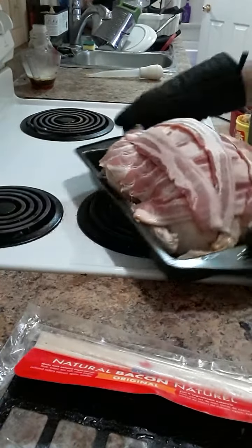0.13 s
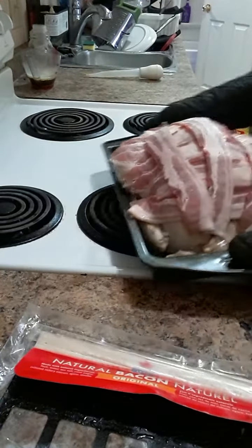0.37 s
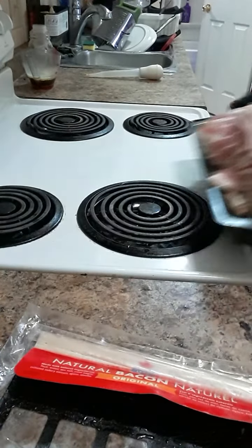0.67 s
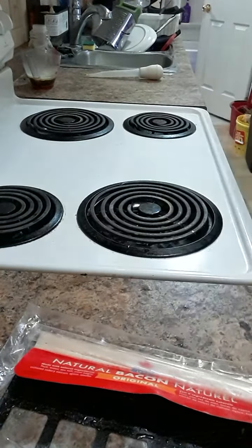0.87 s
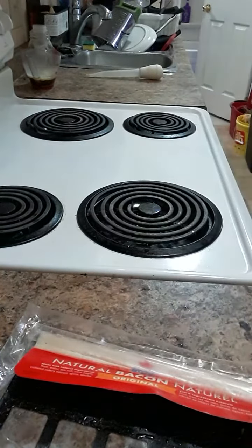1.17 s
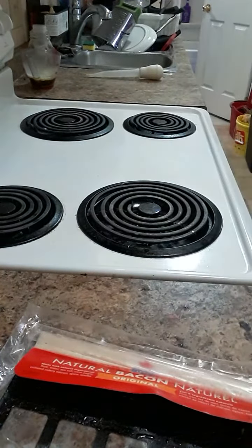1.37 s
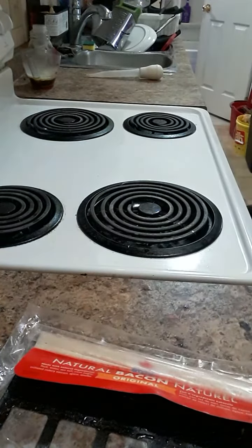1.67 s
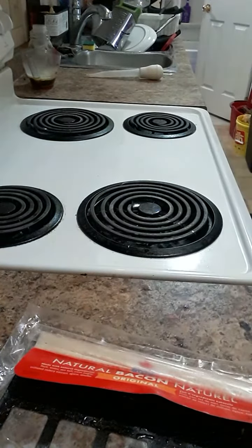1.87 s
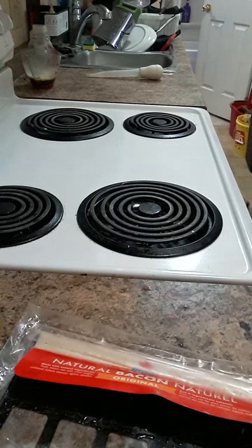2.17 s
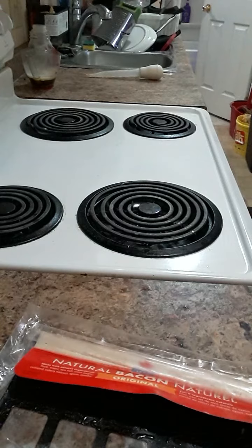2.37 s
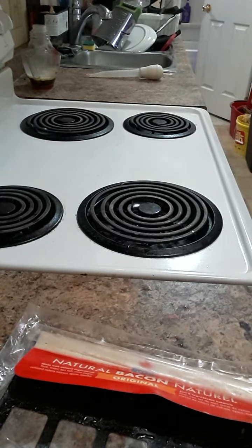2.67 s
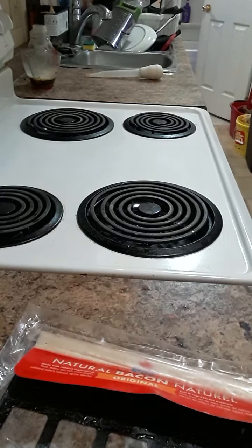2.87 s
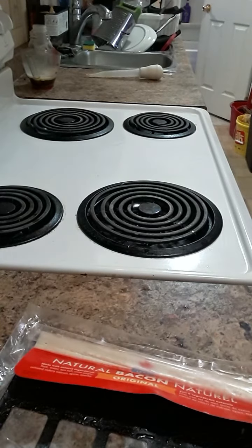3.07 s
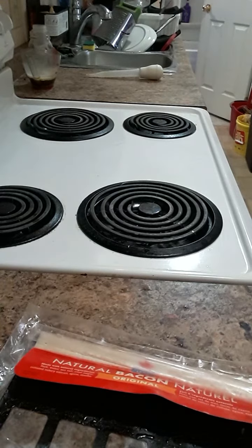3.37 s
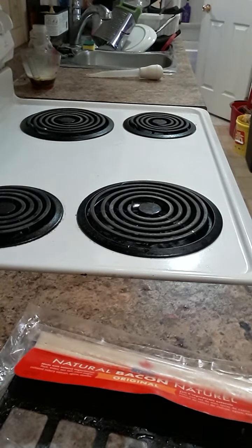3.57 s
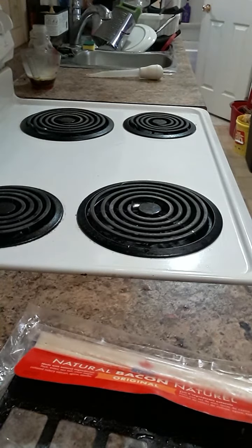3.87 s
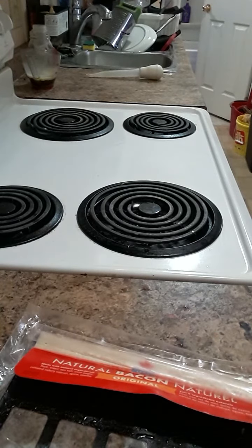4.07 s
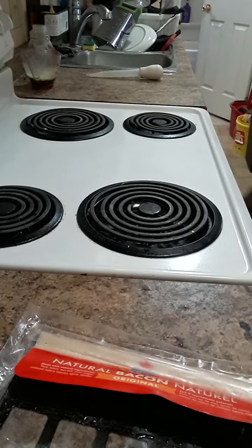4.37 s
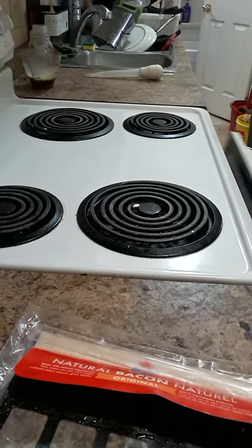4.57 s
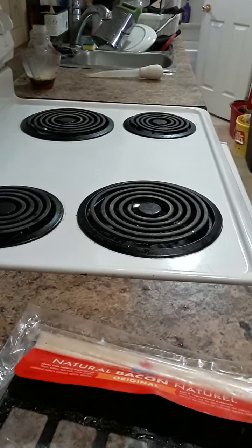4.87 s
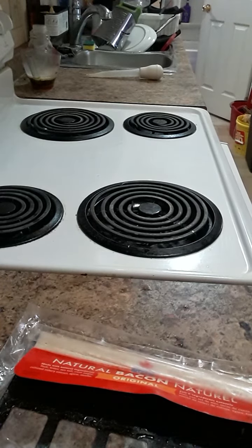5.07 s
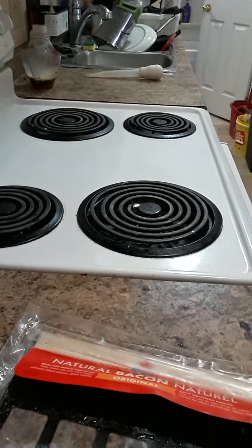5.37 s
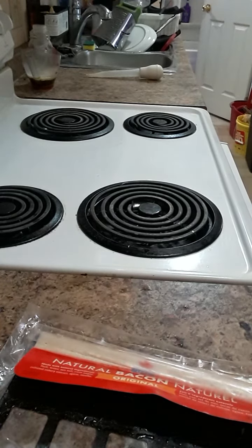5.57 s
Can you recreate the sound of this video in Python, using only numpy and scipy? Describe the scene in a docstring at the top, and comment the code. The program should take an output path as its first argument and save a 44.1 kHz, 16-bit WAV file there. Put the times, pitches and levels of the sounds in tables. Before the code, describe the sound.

Short metallic drag and tap, a pause, loud pan clatter into an oven, faint bumps, then a heavy rattling oven door slam.

```python
"""A steel roasting pan is dragged off an electric hob, stalling once while its rim taps the hob top and the top flexes.
It bumps onto an oven rack and slides in; the oven door swings, slams and bounces; last come two more pan bumps.
Drag, bumps and slams are bursts of random contacts that ring sheet steel; taps and thumps are single pushes on modes.
After the drag, sleeves rustle and the oven booms low; the room hums throughout.
Two microphone ports hear it in a small kitchen, the right one the more open to the treble."""
import sys
import numpy as np
from scipy import signal
from scipy.fft import rfft, irfft
from scipy.io import wavfile
from scipy.ndimage import uniform_filter1d

SR = 44100
rng = np.random.default_rng(int(sys.argv[2]) if len(sys.argv) > 2 else 0)


def materialize(psi):
    """Save the field psi as 16-bit PCM at rate SR to the path in sys.argv[1].

    A 1-D psi becomes a single channel; in a 2-D psi each row is a channel.
    """
    bounded = np.clip(np.atleast_2d(psi).T, -1, 1)
    quanta = np.round(bounded * 32767).astype(np.int16)
    wavfile.write(sys.argv[1], SR, quanta)


N = 251811  # samples

# Levels are relative: source mix, room and port gains follow. A mode's level sets its share of energy.

# the pan bumps the rack and the oven walls:
# (time [s], clatter level [dB], thud over clatter [dB], clank over clatter [dB], clatter t60 [s])
BUMPS = [(0.596, -44, -32, -16, 0.25), (1.106, -64.5, 2, 11, 0.15), (1.592, -47, -5, -8, .16),
         (1.952, -27.5, 2, -5, 0.23), (1.96, -22, -3.5, -4, .22), (1.974, -17.5, -11, -4.5, .24),
         (2.029, -21, -6, -16, 0.3), (2.064, -25.5, -12, -5, 0.29), (2.112, -15.5, -7.5, -7, .2),
         (2.133, -20.5, -22, -17, .21), (2.179, -26, -11, -14, 0.28), (2.223, -31, -4, -12, 0.25),
         (2.267, -35.5, -3, -20, .4), (2.432, -41.5, -1, -6.5, 0.23), (2.688, -46, -12, -7, 0.47),
         (2.859, -48.5, -2, 4.5, 0.28), (2.912, -46.5, 1, 9.5, 0.19), (3.328, -43.5, 5, -24, 0.1),
         (3.584, -44, -30, -11.5, 0.17), (3.768, -36, -3.5, -7.5, 0.15), (3.867, -46.5, 0, -10, .22),
         (4.161, -42.5, 0, -0.5, 0.15), (4.275, -44.5, 0, -3, 0.23), (5.593, -48, -2, -7, 0.11),
         (5.658, -38, -31, -3.5, 0.2)]
# clearest modes of the pan on its rack: (frequency [Hz], width [Hz], level [dB])
PAN_MODES = [(120, 5.1, -5), (280, 2, -10), (331.4, 1.1, 0), (516, 23, 5.5), (567.5, 9.9, 0.5),
             (641, 16, 4), (730, 13, -2.5), (810, 11.4, 0), (871, 18, 0), (1040, 18, -14.5),
             (1084, 22, 0.5), (1338, 21, -4.5), (1727, 20, -32), (2066, 22, -1.5), (2490, 33, -13),
             (3250, 55, -26), (4100, 50, -15), (4760, 50, -23)]
# dense upper modes of sheet steel, three spectra: pan on its rack, door, pan on the hob:
# (frequency [Hz], density [dB per Hz])
STEEL_SPECTRA = [
    [(35, -61), (60, -24), (124, 2.5), (247, -6), (327, 1), (426, -4.5), (532, -6.5), (678, -2), (1040, -4),
     (1580, -7), (2020, -9), (5890, -24.5), (7500, -25.5), (9750, -77), (16500, -120)],
    [(35, -38), (60, -11), (124, 4.5), (198, -9.5), (247, -3), (577, -10), (750, -7.5), (1460, -10),
     (1680, -9), (3620, -12), (4170, -12.5), (6130, -10.5), (7500, -12.5), (9750, -55), (16500, -120)],
    [(24, -59), (40, -38), (108, -6.5), (182, -18), (404, -8.5), (571, -13), (824, -6), (5060, -17.5),
     (7000, -20.5), (9100, -64), (15400, -120)],
]


def pan():
    """Bumps and sliding shake the pan on its rack; every blow is a burst of rattles in loose steel."""
    bumps = blows(BUMPS, rise=.0035, sizzle_db=-9, per_clank=.7, per_clatter=1.05)
    shaken = np.hypot(bumps, slide())
    return steel(shaken, STEEL_SPECTRA[0], PAN_MODES, per_s=3000, spread_db=5.0, level_db=-14.0, ring_db=-5.0)


# the pan slides in along the rack: (time [s], clatter level [dB])
SLIDE = [(2.24, -41.5), (2.45, -51.5), (2.7, -47), (2.92, -59), (3.05, -57), (3.15, -75)]
SLIDE_THUD_DB, SLIDE_CLANK_DB, SLIDE_SIZZLE_DB = -5, -13.5, -26  # dB over the clatter


def slide():
    """The steady chatter of the pan moving on the rack, as four band strengths."""
    over_db = np.array([[SLIDE_THUD_DB], [0], [SLIDE_CLANK_DB], [SLIDE_SIZZLE_DB]])
    return amp(along(SLIDE) + over_db)


# the door leaves its stop, swings, slams and bounces:
# (time [s], clatter level [dB], thud over clatter [dB], clank over clatter [dB], clatter t60 [s])
SLAMS = [(4.56, -28, 7.5, -27, 0.31), (4.584, -32, 6, 3, 0.13), (4.716, -21, -8, -47, 0.19),
         (4.735, -28, -11, -24, 0.26), (4.781, -9, -3, -24, 0.16), (4.79, -12.5, -17, -5.5, 0.098),
         (4.803, -11, -20, -4, 0.23), (4.82, -17, 3.5, -2, 0.33), (4.845, -17, -21, -5.5, 0.19),
         (4.902, -12, -1.5, -5, 0.2), (4.92, -22, -2, -10, 0.14), (4.958, -18.5, -22, -2.5, 0.16),
         (4.987, -34, 3, -7, 0.45), (5.154, -50, 16.5, 1, 0.16)]
# clearest modes of door and cabinet: (frequency [Hz], width [Hz], level [dB])
OVEN_MODES = [(110.8, 3.7, 7.5), (152.2, 1.14, 0.5), (234, 2.2, 0.5), (275, 1.4, -5), (318, 9.7, 0.5),
              (472, 11, 2), (617, 26, 2.5), (738, 20, -15), (800, 5.4, -21), (938, 14, -3), (1120, 26, 4),
              (1310, 14, -9), (1710, 15, -8), (2340, 20, 0), (2460, 16, -9), (3100, 14, -18),
              (3760, 20, 16), (5300, 20, -18), (6430, 20, -13)]


def door():
    """The door's blows shake loose sheet metal and ring the door and cabinet."""
    slams = blows(SLAMS, rise=.003, sizzle_db=3, per_clank=.9, per_clatter=1.35)
    return steel(slams, STEEL_SPECTRA[1], OVEN_MODES, per_s=4000, spread_db=3.0, level_db=-13.0, ring_db=-13.5)


# the door's weight meets the cabinet: (time [s], peak level [dB], contact time [s])
THUMPS = [(4.557, -27.5, 0.001), (4.63, -33, 0.0022), (4.781, -16.5, 0.0012), (4.803, -16, 0.0013)]


def door_thumps():
    """Single rounded pushes ring the door and cabinet."""
    return knock(THUMPS, OVEN_MODES)


# the pan is dragged over the hob coils, stalls, and is dragged again:
# (time [s], scrape level [dB], thud over scrape [dB])
DRAG = [(0.0, -32, -19), (0.14, -40, -8), (0.21, -47, -9), (0.265, -51.5, -4), (0.31, -50.5, 0),
        (0.372, -41.5, -8), (0.424, -39, -6), (0.44, -56, -15), (0.48, -62, -6)]
DRAG_CLANK_DB, DRAG_SIZZLE_DB = -13.5, -16  # dB over the scrape
# modes of the pan base rubbed on a coil: (frequency [Hz], width [Hz], level [dB])
COIL_MODES = [(800, 60, -21), (1016, 180, 0), (1160, 17, -8), (1440, 98, 13), (1570, 63, 4),
              (1880, 180, 46.5), (3300, 61, 16.5)]


def drag():
    """Stick and slip clicks ring the damped base of the pan."""
    s, db, thud_db = np.transpose(DRAG)
    scrape_db = along(np.c_[s, db])
    low_db = along(np.c_[s, db + thud_db])
    strength = amp([low_db, scrape_db, scrape_db + DRAG_CLANK_DB, scrape_db + DRAG_SIZZLE_DB])
    return steel(strength, STEEL_SPECTRA[2], COIL_MODES, per_s=5000, spread_db=-0.5, level_db=-5.0, ring_db=-18.0)


# the pan's rim taps the hob top, a sharp contact, then a softer push:
# (time [s], peak level [dB], contact time [s])
RIM = [(.2755, -18, 0.00035), (.2788, -26, 0.0011)]
# modes of the enamel hob top: (frequency [Hz], width [Hz], level [dB])
HOB_MODES = [(255, 49, 2), (490, 89, -4), (820, 100, 14), (1270, 210, 20), (1630, 140, 4)]


def rim_tap():
    """A sharp contact and a softer, longer push ring the hob top."""
    return knock(RIM, HOB_MODES)


# the pan's weight settles and the hob top flexes:
# (time [s], level [dB], pitch [Hz], swell [s], t60 [s], overtone [Hz], overtone over pitch [dB])
FLEX = (.2765, -24.5, 232, .014, .034, 475, -4)


def flex():
    """A low mode swells over a few cycles and is damped by the pan on top; its overtone peaks sooner."""
    s, db, hz, swell, t60, over_hz, over_db = FLEX
    t, out = np.arange(SR // 4) / SR, np.zeros(N)
    for f, level_db, top in ((hz, db, swell), (over_hz, db + over_db, swell / 2)):
        growth = np.minimum(t / top, 1) ** 0.72
        decay = amp(level_db - 60 * np.maximum(t - top, 0) / t60)
        out[round(s * SR):][:len(t)] += growth * decay * np.sin(2 * np.pi * f * t)
    return out


# a pan handle clinks: (time [s], peak level [dB], contact time [s])
TICK = [(1.592, -38.5, 0.00021)]
# modes of the handle: (frequency [Hz], width [Hz], level [dB])
HANDLE_MODES = [(1225, 35, 0), (1750, 45, 1)]


def handle_clink():
    """One very short push rings the handle."""
    return knock(TICK, HANDLE_MODES)


# the pan's weight booms in the oven: (time [s], peak level [dB], contact time [s])
THUDS = [(2.862, -39, 0.005), (3.33, -44, 0.0015), (3.772, -41, 0.0042), (3.872, -41.5, 0.0067)]
# boom modes of the empty oven: (frequency [Hz], width [Hz], level [dB])
CAVITY_MODES = [(145, 21, -2), (282.7, 12, -2.5), (334.7, 38, 2.5)]


def pan_thuds():
    """Single rounded pushes ring the oven cavity."""
    return knock(THUDS, CAVITY_MODES)


# sleeves and mitts brush softly as the cook moves: (time [s], rustle level [dB])
RUSTLE = [(0.5, -77), (0.75, -81), (0.82, -69), (0.95, -85), (1.11, -70.5), (1.3, -70), (1.39, -76),
          (1.64, -65.5), (1.93, -73.5), (2.4, -66), (2.7, -63.5), (2.85, -66.5), (2.92, -54.5), (2.99, -69),
          (3.36, -76), (3.45, -72.5), (3.62, -68), (3.85, -70), (3.92, -60), (4.05, -71), (4.29, -64),
          (4.5, -70), (5.04, -59), (5.13, -59), (5.17, -58.5), (5.25, -63.5), (5.42, -64), (5.52, -58.5),
          (5.71, -66.5)]
# low boom in the open oven: (time [s], level [dB])
BOOM = [(0.5, -66), (0.76, -57), (1.0, -64.5), (1.9, -62.5), (2.25, -43), (2.7, -51.5), (2.93, -48.5),
        (3.03, -63), (3.37, -54.5), (3.7, -63), (3.79, -57), (3.88, -59), (4.3, -61), (4.5, -51),
        (5.0, -53), (5.15, -43.5), (5.3, -46.5), (5.5, -53), (5.65, -51.5), (5.71, -45)]
RUSTLE_SIZZLE_DB, SIZZLE_GROWTH = -3, 1.3  # dB over a rustle of -62 dB; treble dB gained per dB of rustle


def rustle():
    """Very fine friction, nearly smooth, with a rumble from the oven cavity."""
    brush_db = along(RUSTLE)
    top_db = brush_db + RUSTLE_SIZZLE_DB + (SIZZLE_GROWTH - 1) * (brush_db + 62)
    middle, low, top = uniform_filter1d(amp([brush_db, along(BOOM), top_db]), 800, axis=1)
    # (frequency [Hz], density [dB per Hz])
    cloth = [(100, 2.0), (700, -2), (2000, -8.5), (3800, -10.0), (5800, -7), (8000, -17.5), (9500, -45)]
    low, dull, bright, top = rattle([low, middle, middle, top], cloth, per_s=15000, spread_db=1.0)
    boom = signal.oaconvolve(low, ring(CAVITY_MODES))[:N]
    boom *= np.std(low) / np.std(boom)
    return amp(-6.0) * boom + amp(-3.5) * dull + amp(-13.0) * bright + amp(-4.0) * top


# room tone: (frequency [Hz], density [dB per Hz])
HUM = [(15, -50), (25, -6.5), (70, -9), (140, 5), (181, -17), (389, -7), (437, -10), (620, -12),
       (680, -15.5), (747, -12), (1770, -23), (1940, -28), (6500, -40.5), (9000, -37), (13000, -40.5),
       (16000, -38)]
HUM_DB = -54  # RMS level [dB] ahead of the ports
# likeness of the two sides: (frequency [Hz], left-right correlation [-1 to 1])
HUM_SAME = [(60, 1), (180, 0.92), (550, 0.48), (1650, -0.31), (4970, -0.15), (15000, 1)]


def hum():
    """Room tone from random short-time spectra with drifting patches."""
    frames, hz = N // 512 + 5, np.fft.rfftfreq(2048, 1 / SR)
    a, b, c, d, patches = rng.standard_normal((frames, 1025, 5)).T
    patches = evened(uniform_filter1d(uniform_filter1d(patches, 12, 0), 8, 1))
    same = np.clip(read(HUM_SAME, hz), -1, 1)[:, None]
    left, other = a + 1j * b, c + 1j * d
    z = np.array([left, same * left + np.sqrt(1 - same ** 2) * other])
    z *= amp(read(HUM, hz)[:, None] + 0.8 * patches)
    return amp(HUM_DB) * evened(signal.istft(z, nperseg=2048, noverlap=1536)[1][:, :N])


def blows(rows, rise, sizzle_db, per_clank, per_clatter):
    """Each blow swells and dies away as the loose metal settles; the treble dies first.

    rise [s]; sizzle_db: dB over a clatter of -18 dB with clank at 0 dB over it;
    per_clank, per_clatter: sizzle dB gained per dB of each.
    """
    power, t = np.zeros((4, N)), np.arange(SR // 2) / SR
    longer = np.array([[1.2], [1], [.9], [.7]])  # t60 of thud, clatter, clank, sizzle over the row's
    for s, db, thud_db, clank_db, t60 in rows:
        settle = (1 - np.exp(-t / rise)) * amp(db - 60 * t / (longer * max(t60, .03)))
        top_db = sizzle_db + per_clank * clank_db + (per_clatter - 1) * (db + 18)
        burst = (amp([[thud_db], [0], [clank_db], [top_db]]) * settle) ** 2
        part = power[:, round(s * SR):][:, :len(t)]
        part += burst[:, :part.shape[1]]
    return np.sqrt(power)


def steel(strength, spectrum, modes, per_s, spread_db, level_db, ring_db):
    """Rattles heard straight and through the clearest modes of the object; the sizzle stays straight."""
    *body, top = rattle(strength, spectrum, per_s, spread_db)
    body = sum(body)
    rung = signal.oaconvolve(body, ring(modes))[:N]
    rung *= np.std(body) / np.std(rung)
    return amp(level_db) * (body + amp(ring_db) * rung + top)


def rattle(strength, spectrum, per_s, spread_db):
    """Random contacts of uneven size; four strengths drive their bands from thud to sizzle."""
    size = amp(spread_db * np.minimum(rng.exponential(1, N), 3.3)) * rng.choice([-1., 1.], N)
    contacts = size * (rng.random(N) < per_s / SR)
    coloured, hz = rfft(colour(contacts, spectrum)), np.fft.rfftfreq(N, 1 / SR)
    below_low, below_high = [1 / (1 + (hz / edge) ** 4) for edge in (750, 2800)]
    shares = (below_low, below_high - below_low, 1 - below_high)  # thud, clatter, clank
    parts = [irfft(coloured * share, N) for share in shares]
    # the sizzle comes from the uncoloured contacts
    parts.append(signal.sosfilt(signal.butter(4, 8500, "high", fs=SR, output="sos"), contacts))
    return [evened(part) * level for part, level in zip(parts, strength)]


def knock(rows, modes):
    """A rounded push rings the object; a long contact leaves the high modes quiet."""
    out = np.zeros(N)
    for s, db, contact in rows:
        push = np.sin(np.pi * np.arange(0, 1, 1 / (contact * SR))) ** 2
        tap = np.convolve(ring(modes), push)[:SR // 2]
        out[round(s * SR):][:len(tap)] += amp(db) * tap / abs(tap).max()
    return out


def ring(modes):
    """The impulse response of an object, energy 1; a wide mode dies fast."""
    t, out = np.arange(SR) / SR, np.zeros(SR)
    for hz, width, db in modes:
        decay = np.sqrt(width) * np.exp(-np.pi * width * t)
        out += amp(db) * decay * np.sin(2 * np.pi * hz * t)
    return out / np.linalg.norm(out)


def kitchen(x, wet_db):
    """Direct sound plus echoes; three echo patterns take turns, which keeps the reverb diffuse."""
    turn = 2 * np.pi * 7 * np.arange(N) / SR  # 7 Hz
    shares = [np.sqrt(2 / 3) * np.cos(turn + k * np.pi / 3) for k in range(3)]
    wet = sum(signal.fftconvolve((x * share)[None], echoes(), axes=1)[:, :N] for share in shares)
    lag = 13  # samples by which the right port hears the direct sound later
    return np.array([x, np.roll(x, lag)]) + amp(wet_db) * wet


# reverb of the small kitchen: (frequency [Hz], t60 [s])
KITCHEN = [(100, 0.44), (300, 0.35), (1000, 0.2), (4000, 0.12), (14000, 0.14)]


def echoes():
    """Sparse taps that die by band, energy 1 at the left; long waves reach both ports alike."""
    taps = np.zeros((2, SR // 2))
    at = np.arange(40, SR // 2 - 20, 20) + rng.integers(0, 20, (2, (SR // 2 - 41) // 20))
    np.put_along_axis(taps, at, rng.choice([-1., 1.], at.shape), 1)
    hz, t, z = signal.stft(taps, SR, nperseg=256)
    same = np.exp(-(hz / 1000.) ** 2)[:, None]
    z[1] = same * z[0] + np.sqrt(1 - same ** 2) * z[1]
    z *= (hz / (hz + 462.0))[:, None]  # the echoes are thin in the bass
    fade = amp(-60 * t / read(KITCHEN, hz)[:, None])
    tail = signal.istft(z * fade, SR, nperseg=256)[1]
    return tail / np.linalg.norm(tail[0])


# the casing cancels a band: (frequency [Hz], gain [dB])
PORT_DIP = [(6000, 1.5), (7500, -10.5), (9500, -21.5), (11000, -9), (12000, -4.5)]
# balance of the ports, before it is eased off in the bass: (frequency [Hz], left over right [dB])
LEAN = [(60, 7), (110, -11.5), (200, 14), (380, -5), (700, -1), (1290, 1), (2380, -2), (4400, -5),
        (8120, -22.5), (15000, -8)]


def ports(x):
    """Each port colours what it hears; the left is shaded from the treble."""
    hz = np.geomspace(20, 20000, num=60)
    lean_db, dip_db = read(LEAN, hz) * hz / (hz + 400), read(PORT_DIP, hz)
    return np.array([colour(x[k], np.c_[hz, dip_db + sign * lean_db / 2]) for k, sign in enumerate((1, -1))])


def amp(db):
    """Decibels to amplitude."""
    return 10 ** (np.asarray(db) / 20)


def evened(x):
    """Scale to an RMS of 1."""
    return x / np.sqrt(np.mean(x ** 2) + 1e-20)


def along(curve):
    """A level curve in dB for every sample, practically silent outside its span."""
    s, db = np.transpose(curve)
    return np.interp(np.arange(N) / SR, s, db, left=-150, right=-150)


def read(points, hz):
    """A table over frequency, joined on a log-frequency axis."""
    f, value = np.transpose(points)
    return np.interp(np.log(hz + 1), np.log(f + 1), value)


def colour(x, points):
    """Causal filter: its phase is the Hilbert transform of the log gain."""
    db = np.maximum(read(points, abs(np.fft.fftfreq(8192, 1 / SR))), -100)
    response = np.exp(np.conj(signal.hilbert(np.log(amp(db)))))
    taps = np.fft.ifft(response).real[:4096]
    return signal.oaconvolve(x, taps)[:N]


def scene():
    """Place the sources in the kitchen, far ones with more echo, and add the hum at the ports."""
    far = kitchen(pan() + door() + rustle() + door_thumps() + pan_thuds(), wet_db=6.0)
    near = kitchen(drag(), wet_db=3.0) + kitchen(rim_tap() + flex() + handle_clink(), wet_db=-8.0)
    return ports(far + near + hum())


EDGE_HZ = 15850  # cutoff of the treble limit


def record(dry):
    """The microphone drops the deepest bass; a steep filter then limits the treble."""
    thin = signal.sosfilt(signal.butter(3, 50., "high", fs=SR, output="sos"), dry)
    return signal.oaconvolve(thin, signal.firwin(1023, EDGE_HZ, window=("kaiser", 11), fs=SR)[None], "same")


dry = scene()
out = record(dry)
materialize(out)
```